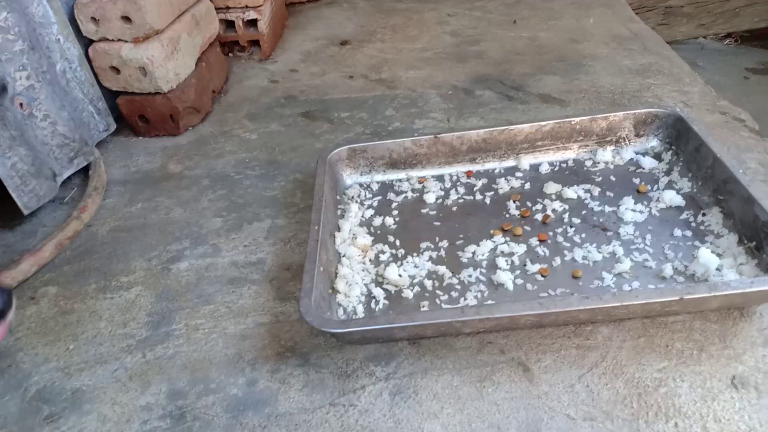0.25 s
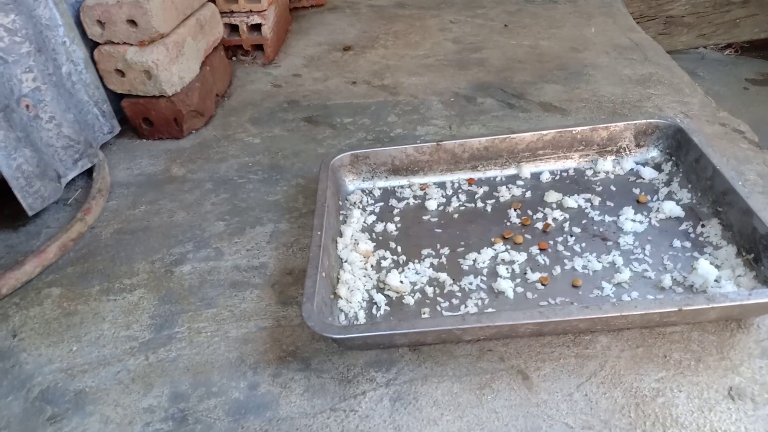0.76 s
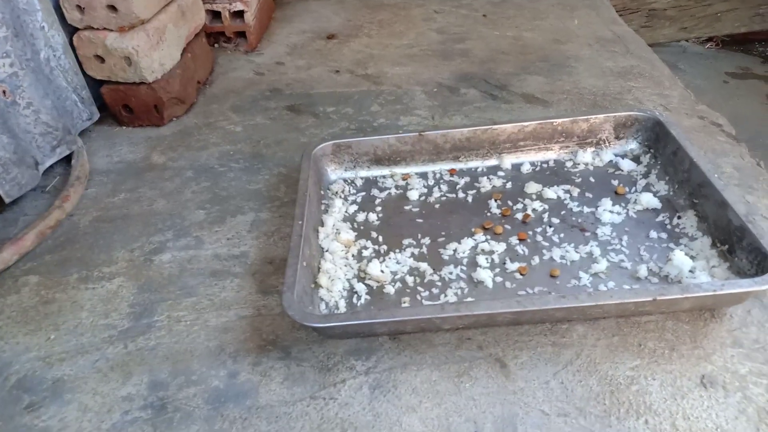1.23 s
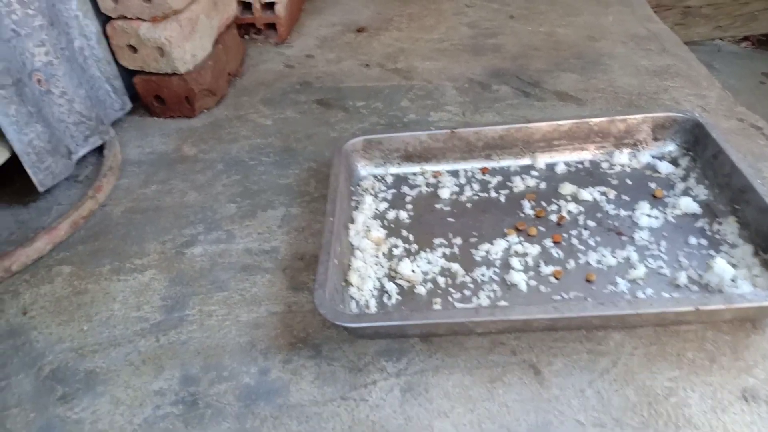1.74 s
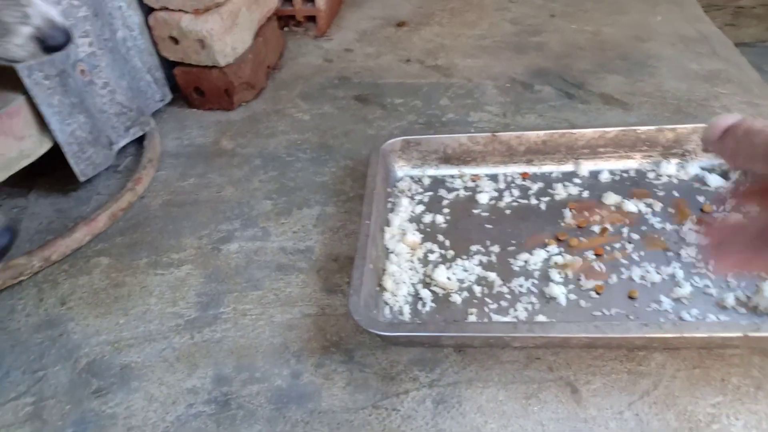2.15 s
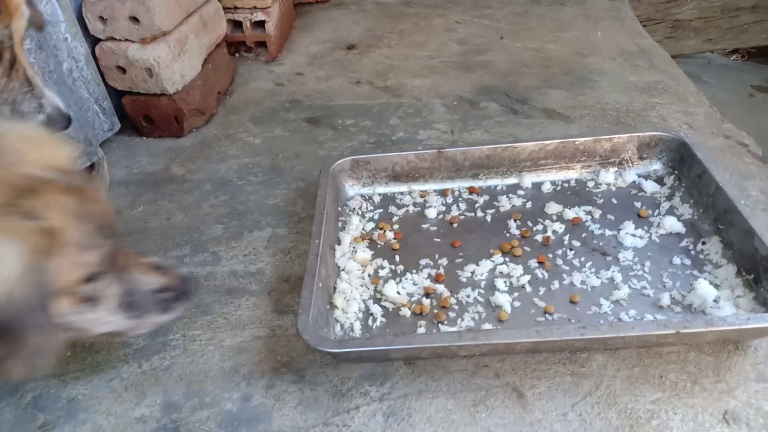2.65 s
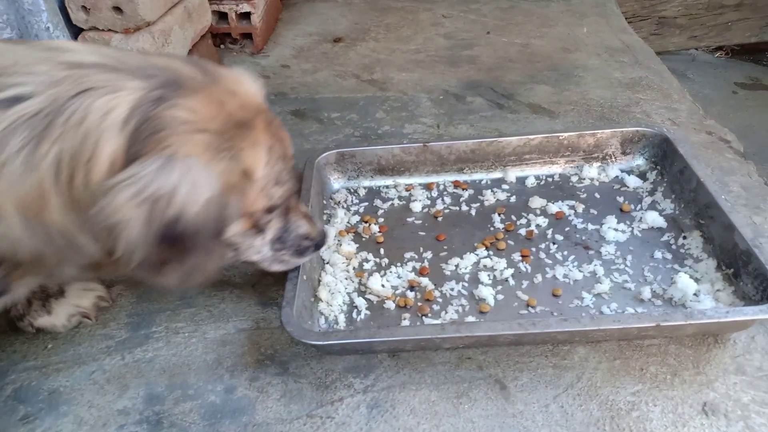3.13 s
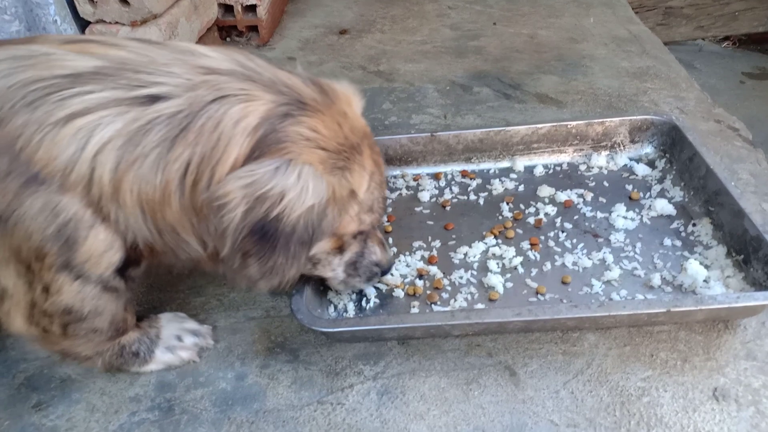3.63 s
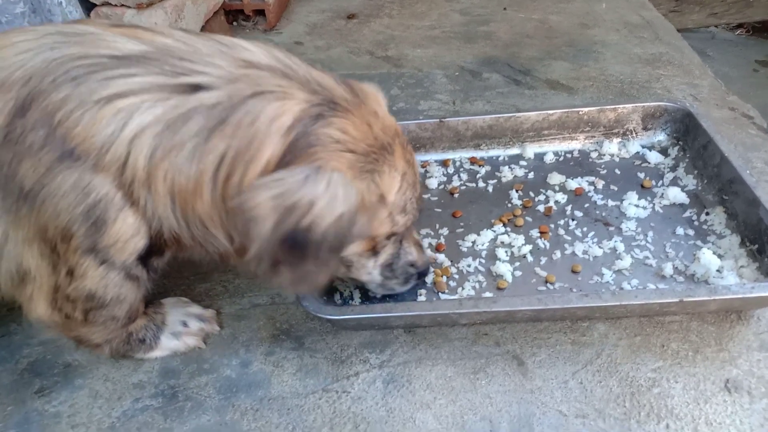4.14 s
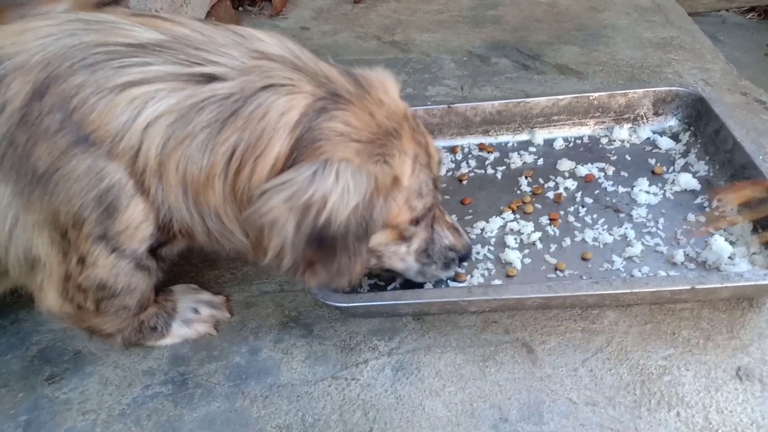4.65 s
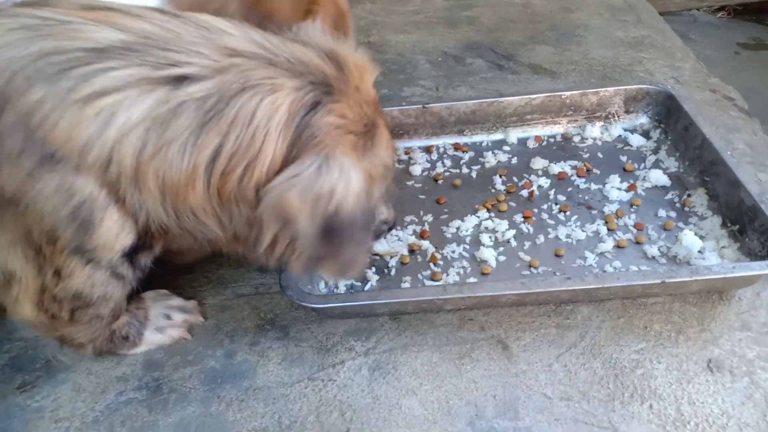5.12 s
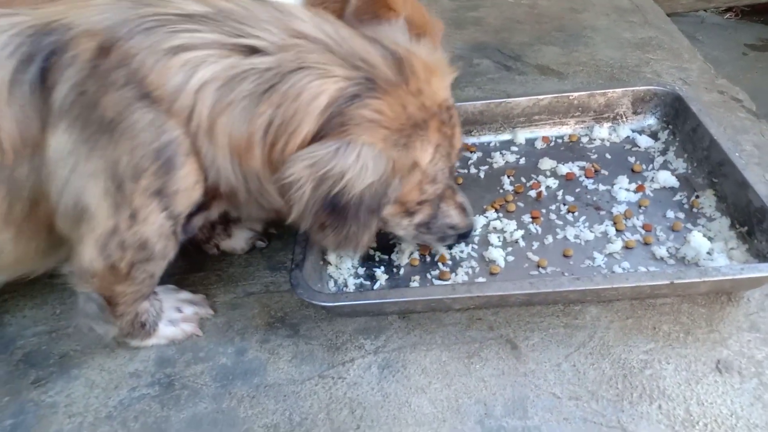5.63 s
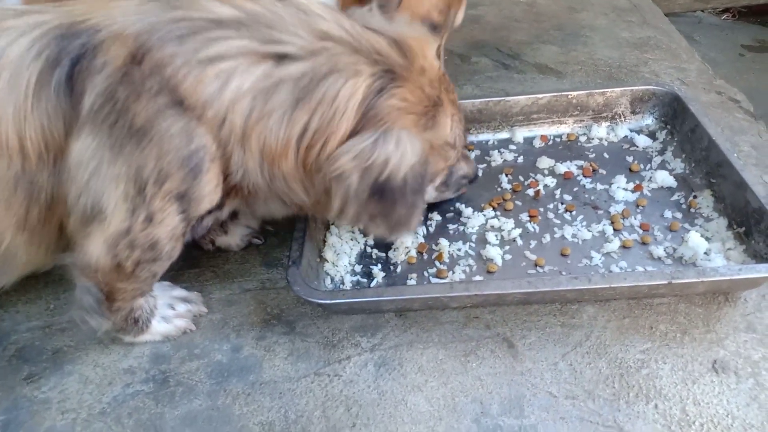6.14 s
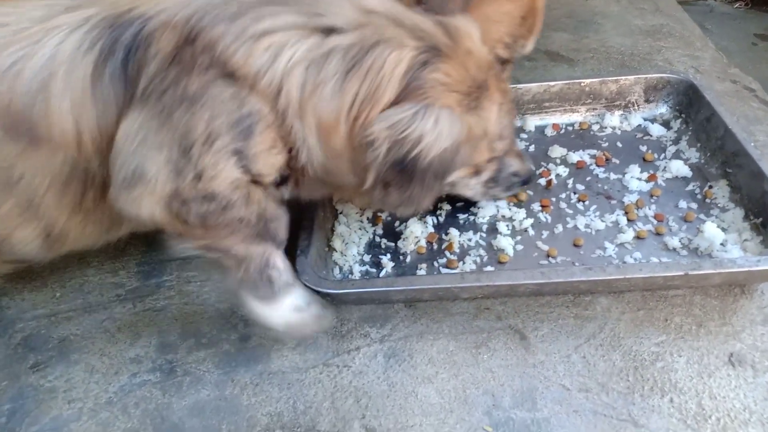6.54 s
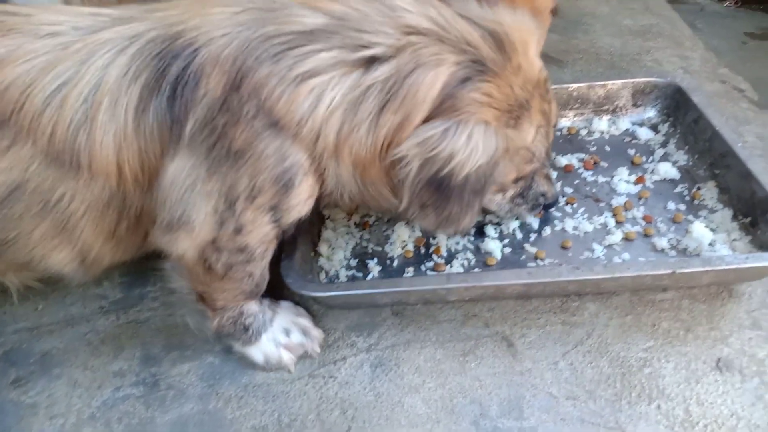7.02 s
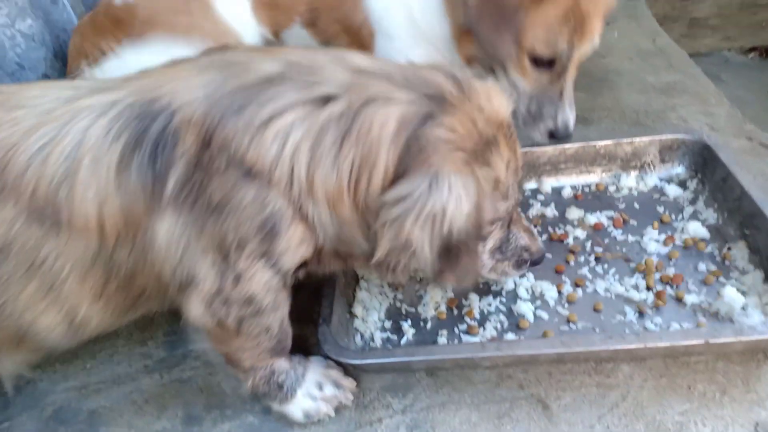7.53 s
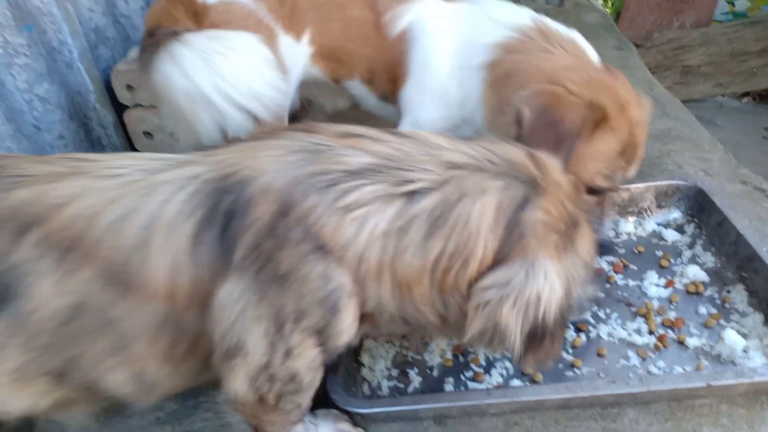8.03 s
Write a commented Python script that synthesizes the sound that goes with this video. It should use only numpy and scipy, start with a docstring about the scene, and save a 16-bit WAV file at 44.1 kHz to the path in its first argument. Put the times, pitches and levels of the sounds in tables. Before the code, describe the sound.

In a small walled yard with soft open-air hiss and a distant idling engine, a brief dropout comes early. A hand rummages in a plastic bag of kibble, then pellets shower and bounce on a steel tray. This happens three times, while a dog nearby starts chewing with wet smacks. Faint bird whistles, rubs and dull bumps join in. Close stereo microphone.

```python
"""First a distant engine hums under soft open-air hiss; early on, all sound is briefly cut to silence.
Rubs, ticks and bird whistles follow in a small walled yard where dogs are fed from a steel tray.
Three times a hand rummages in a bag of kibble and tosses some in: pellets shower down and bounce.
A dog smacks and chews. Hiss, rubs and crackle are filtered noise and clicks; the engine, squeaks
and birds are sine waves; blows ring the modes of the tray, and clacks and smacks are short pops."""
import sys
import numpy as np
from scipy import signal
from scipy.fft import rfft, irfft
from scipy.io import wavfile
from scipy.ndimage import uniform_filter1d

SR = 44100
rng = np.random.default_rng(int(sys.argv[2]) if len(sys.argv) > 2 else 0)


def transcribe(signal):
    """Save signal, clipped to [-1, 1], as a 16-bit WAV file at the path in sys.argv[1]."""
    frames = np.atleast_2d(signal).T
    limited = np.clip(frames, -1, 1)
    pcm = np.round(limited * 32767).astype(np.int16)
    wavfile.write(sys.argv[1], SR, pcm)


N = 365148
TIME = np.arange(N) / SR
GAP_START_S, GAP_END_S = 0.144, 0.255  # the short cut to silence


def amp(db):
    """Decibels to gain."""
    return 10 ** (np.asarray(db) / 20)


def evened(x):
    """Scales to an rms of one."""
    return x / np.sqrt(np.mean(x ** 2) + 1e-20)


def read(points, hz):
    """Reads a table between its points on a log-frequency axis."""
    f, value = np.transpose(points)
    return np.interp(np.log(hz + 1), np.log(f + 1), value)


def level(rows):
    """Gain through time from rows of t/s, level/dB; silent outside them."""
    s, db = np.transpose(rows)
    return np.interp(TIME, s, amp(db), left=0, right=0)


def add(mix, s, sound):
    """Lays a sound into a mix at time s, cut off at the end."""
    part = mix[..., max(round(s * SR), 0):][..., :sound.shape[-1]]
    part += sound[..., :part.shape[-1]]


def convolve(x, response):
    """Filters along time, keeping the scene's length."""
    return signal.fftconvolve(np.atleast_2d(x), np.atleast_2d(response), axes=1)[:, :N]


def click(spectrum, tilt_db=0, size=2048):
    """A click with this spectrum, its energy as early as possible (minimum phase) and equal to one."""
    hz = abs(np.fft.fftfreq(size, 1 / SR))
    octaves = np.log2(np.maximum(hz, 100) / 1000)  # the tilt turns around 1000 Hz
    log_gain = np.log(amp(read(spectrum, hz) + tilt_db * octaves))
    wave = np.fft.ifft(np.exp(np.conj(signal.hilbert(log_gain)))).real[:size // 2]
    return wave / np.linalg.norm(wave)


def grains(per_s, spread_db, size=N):
    """A random train of clicks of uneven size and power one."""
    sizes = amp(spread_db * np.minimum(rng.exponential(1, size), 3))
    sizes = sizes * rng.choice([-1, 1], size)
    return evened(sizes * (rng.random(size) < per_s / SR))


def pop(hz, swell_s, size=900):
    """A heavily damped cavity: a few cycles that swell and die."""
    t = np.arange(size) / SR
    return t / swell_s * np.exp(1 - t / swell_s) * np.sin(2 * np.pi * hz * t)


def waver(per_s):
    """Random wandering of rms one, holding only frequencies below per_s Hz."""
    spectrum = rfft(rng.standard_normal(N))
    return evened(irfft(spectrum * (np.fft.rfftfreq(N, 1 / SR) < per_s), N))


# how alike left and right are in sound from all around: f/Hz, likeness (1 = identical)
LIKENESS = [(50, 1), (250, 0.79), (600, 0.67), (1200, 0), (2500, 0.017), (16000, 0.17)]


def diffuse(size=N):
    """Two channels of noise, alike in the bass and nearly unrelated in the treble."""
    a, b = rfft(rng.standard_normal((2, size)))
    same = np.clip(read(LIKENESS, np.fft.rfftfreq(size, 1 / SR)), -1, 1)
    return irfft([a, same * a + np.sqrt(1 - same ** 2) * b], size)


def burst(decay_s, size=4000):
    """Dying noise like a dense cluster of modes, different at each port, of energy one."""
    wave = diffuse(size) * np.exp(-np.arange(size) / SR / decay_s)
    return wave / np.linalg.norm(wave, axis=1, keepdims=True)


def softened(x, corner_hz):
    """A longer contact rolls off the treble."""
    r = np.exp(-2 * np.pi * corner_hz / SR)
    return signal.lfilter([1 - r], [1, -r], x)


# how long the yard walls ring: f/Hz, time to fall by 60 dB/s
YARD_RING = [(200, 0.31), (1000, 0.23), (3000, 0.22), (6000, 0.2), (15000, 0.14)]


def yard(x, wet_db, lag_samples, pan_db=0, size=16384):
    """Direct sound reaches the right port lag_samples after the left, then the walls ring."""
    hz, t, z = signal.stft(diffuse(size), SR, nperseg=256)
    fading = amp(-60 * t / read(YARD_RING, hz)[:, None])
    tail = signal.istft(z * fading, SR, nperseg=256)[1]
    tail = tail * np.minimum(np.arange(tail.shape[1]) / SR / 0.0024, 1)  # echoes build up in 2.4 ms
    n = np.arange(tail.shape[1]) - 8  # room for the sinc, which delays by parts of a sample
    left = np.sinc(n) * amp(pan_db / 2)
    right = np.sinc(n - lag_samples) * amp(-pan_db / 2)
    return convolve(x, np.array([left, right]) + amp(wet_db) * tail / np.linalg.norm(tail[0]))


# colour of the open-air hiss: f/Hz, level/dB
HISS = [(20, -50), (45, 1.5), (100, -9.5), (250, -2.5), (400, -4.5), (650, -5), (950, -9.5), (1900, -8.5),
        (2600, -9), (3600, -20), (5600, -18), (9000, -34.5), (14000, -29.5), (16000, -39)]
# colour of the far traffic: f/Hz, level/dB
RUMBLE_COLOUR = [(20, -43), (50, -26), (78, -13), (93, 3), (140, 4.5), (200, -10.5), (400, -37),
                 (1000, -62)]
# a far engine idling: t/s, firing rate f/Hz
IDLE_RATE = [(0, 27.5), (2.4, 28), (4.0, 27.5), (4.8, 29.5), (6.6, 29), (7.4, 29), (8.0, 30.6),
             (8.28, 30.5)]
# its overtones: multiple of the firing rate, level/dB
ENGINE_OVERTONES = [(2, -17.5), (3, -17), (4, -1.5), (5, -3), (6, -3), (8, -10)]
# how loud traffic and engine are over time, before their own gains: t/s, level/dB
TRAFFIC_LEVEL = [(0.0, -61.5), (2.19, -56.5), (3.71, -58.5), (3.96, -54.5), (6.2, -52.5), (7.75, -54.5),
                 (8.28, -50)]


def outdoors(hiss_db=-56.5, early_db=-5, swell_db=1.2, rumble_db=-5, engine_db=-4, throb_db=4.0):
    """Filtered noise makes the hiss and rumble; unsteady sine overtones make the idling engine."""
    hz = np.fft.rfftfreq(N, 1 / SR)
    hiss = rfft(diffuse()) * amp(read(HISS, hz))
    hiss = irfft(hiss, N) / np.std(irfft(hiss * (hz > 300), N))  # scaled by its part above 300 Hz
    early = early_db * (TIME < GAP_START_S)  # the hiss is softer before the silent gap
    hiss = amp(hiss_db + early + swell_db * waver(per_s=4.7)) * hiss
    rumble = evened(irfft(rfft(diffuse()) * amp(read(RUMBLE_COLOUR, hz)), N))
    rate = np.interp(TIME, *np.transpose(IDLE_RATE)) * (1 + 0.006 * waver(per_s=2.95))
    turns = np.cumsum(rate) / SR
    engine = np.zeros(N)
    for multiple, db in ENGINE_OVERTONES:
        throb = amp(db + throb_db * waver(per_s=2.8))
        engine += throb * np.sin(2 * np.pi * (multiple * turns + rng.random()))
    traffic = amp(rumble_db) * rumble + amp(engine_db) * evened(engine)
    return hiss + traffic * amp(np.interp(TIME, *np.transpose(TRAFFIC_LEVEL)))


# short rubs and swishes of paws, muzzle, bag and throwing arm:
# t/s, length/s, level/dB, tilt/dB per octave
RUB_TIMES = [(0.083, 0.038, -60.5, 0.5), (0.983, 0.13, -57.5, -5.5), (2.108, 0.16, -57, 5),
             (2.338, .014, -50, -6), (3.315, 0.055, -36.5, 0), (4.416, 0.049, -41.5, 2),
             (4.482, 0.05, -37, 2), (4.644, 0.048, -51.5, 1), (5.642, 0.033, -45, -2.5),
             (7.228, 0.036, -37.5, -0.5), (7.373, 0.089, -38.5, 0), (7.5, 0.015, -39.5, -4.5),
             (7.899, 0.023, -42.5, 2.5), (8.003, 0.024, -44, -3), (8.187, 0.07, -49, 5)]
# colour of a rub: f/Hz, level/dB
RUB_COLOUR = [(150, -11), (300, -14), (600, -2), (1000, 2.5), (1400, -0.5), (2400, 6), (3600, -4.5),
              (5800, -0.5), (8500, -20.5), (15000, -19.5)]
# dull bumps against the tray: t/s, peak level/dB
BUMP_TIMES = [(7.234, -29), (7.405, -44), (7.513, -35), (7.586, -43), (8.083, -41)]
# tones of one bump: f/Hz, level/dB, time to fall by 60 dB/s
BUMP_MODES = [(272, -6, 0.061), (291, -3, 0.1), (372, -7, 0.082), (498, 1.5, 0.065), (539, -4, 0.14)]


def rubs_and_bumps(contact_s=0.0014, size=8000):
    """Rubs and swishes are trains of fine clicks; dull bumps that rock the tray are dying sine waves."""
    sound, t = np.zeros(N), np.arange(size) / SR
    for s, length, db, tilt_db in RUB_TIMES:
        stroke = signal.windows.tukey(int(length * SR), .7)
        grit = grains(per_s=4300, spread_db=-1.5, size=len(stroke))
        add(sound, s, amp(db) * signal.fftconvolve(stroke * grit, click(RUB_COLOUR, tilt_db)))
    bump = sum(amp(db - 60 * t / t60) * np.sin(2 * np.pi * hz * t) for hz, db, t60 in BUMP_MODES)
    bump = bump * np.minimum(t / contact_s, 1)  # a soft muzzle pushes rather than strikes
    for s, db in BUMP_TIMES:
        add(sound, s, amp(db) * bump / abs(bump).max())
    return yard(sound, wet_db=-2.0, lag_samples=1, pan_db=-6.0)


# the hand digging into the kibble: t/s, length/s, level/dB
DIG_TIMES = [(1.211, 0.29, -30.5), (3.175, 0.16, -44.5), (3.367, 0.24, -46.5), (3.578, 0.17, -46.5),
             (3.744, 0.18, -33), (6.124, 0.19, -36.5), (6.285, 0.15, -33)]
# the heap giving way and trickling to rest: t/s, level/dB
SLIDE_TIMES = [(1.47, -41.5), (1.529, -39.5), (3.92, -37), (3.997, -36.5), (4.16, -44), (4.228, -40.5),
               (6.471, -37.5), (6.63, -41.5), (6.69, -50)]


def stirring(dig_skew=1.38, slide_rise_s=0.0041, slide_fade_s=0.061):
    """How fast the kibble moves: digs swell slowly and stop quickly, slides start at once and die away."""
    effort, t = np.zeros(N), np.arange(SR // 2) / SR
    for s, length, db in DIG_TIMES:
        progress = np.linspace(0, 1, int(length * SR))
        add(effort, s, amp(db) * np.sin(np.pi * progress ** dig_skew))
    for s, db in SLIDE_TIMES:
        add(effort, s, amp(db) * np.minimum(t / slide_rise_s, 1) * np.exp(-t / slide_fade_s))
    return effort


# colour of the rustle in the bag: f/Hz, level/dB
RUSTLE_COLOUR = [(240, -66), (400, -40), (626, -29), (839, -31.5), (1290, -5.5), (1420, -12.5), (1600, 0),
                 (2630, -3.5), (3420, -6.5), (5960, -0.5), (7750, -26.5), (9760, -37), (14400, -22.5),
                 (16000, -90)]
# pellets clacking together, before the gains in bag(): t/s, level/dB, ring f/Hz
CLACK_TIMES = [(1.3912, -21.5, 2710), (1.4423, -21.5, 2690), (1.546, -29, 2740), (3.7897, -36, 2680),
               (3.9549, -29, 2620), (3.997, -27.5, 2570), (4.004, -28, 2600), (4.1804, -20.5, 2630),
               (4.223, -25, 2590), (4.2827, -29.5, 2650), (6.4149, -25.5, 2400), (6.4693, -29.5, 2100),
               (6.5268, -29.5, 2570), (6.6294, -24, 2490), (6.672, -30.5, 2550), (6.6958, -22.5, 2520),
               (6.7677, -29.5, 2540)]
# hard ticks of kibble, plastic and claws, before the gains in bag(): t/s, level/dB
TICK_TIMES = [(0.2967, -44.5), (0.5035, -39.5), (0.5146, -40), (0.6908, -43.5), (0.836, -46.5),
              (1.3343, -26.5), (1.443, -23), (1.5227, -31.5), (1.6122, -30.5), (1.7643, -31.5),
              (2.013, -45.5), (3.8804, -27), (4.161, -27.5), (4.2254, -27), (4.4899, -31), (5.317, -44),
              (6.2575, -30.5), (7.879, -39)]
# colour of a tick: f/Hz, level/dB
TICK_COLOUR = [(400, -28), (1500, -4.5), (2600, -3.5), (3600, -1.5), (5800, 5.5), (8500, -17), (11000, -23),
               (14800, -16)]


def bag(stir_db=-5, grind_db=-2, clack_db=2, snap_db=8, tick_db=17, crinkle_db=-2, crackle_db=-12, count=8):
    """Pellets grind and clack as clicks and damped pops; the plastic around them ticks and crackles."""
    effort = stirring() * amp(2 * waver(per_s=89))  # the heap sticks and slips
    rustle = amp(stir_db) * convolve(effort * grains(per_s=1300, spread_db=4.5), click(RUSTLE_COLOUR))
    for hz in np.linspace(2250, 2850, count):  # many small clacks at several pitches
        clack = pop(hz, swell_s=0.00056)
        clack = clack / np.linalg.norm(clack)
        grind = convolve(effort * grains(per_s=40, spread_db=4.5), clack)
        rustle += amp(grind_db) * grind / np.sqrt(count)
    clacks, ticks = np.zeros(N), np.zeros((2, N))
    for s, db, hz in CLACK_TIMES:
        add(clacks, s, amp(db + clack_db) * pop(hz, swell_s=0.00077))
        add(ticks, s, amp(db + snap_db) * burst(decay_s=0.0025))
    for s, db in TICK_TIMES:
        tick = burst(decay_s=0.0011) + amp(crinkle_db) * burst(decay_s=0.0074)
        add(ticks, s, amp(db + tick_db) * tick)
    # the plastic crackles as the heap moves
    ticks += amp(crackle_db) * effort * grains(per_s=110, spread_db=3)
    ticks = convolve(ticks, click(TICK_COLOUR))
    near = yard(rustle + ticks, wet_db=-3, lag_samples=4.55, pan_db=-2.5)
    return near + yard(clacks, wet_db=-2.5, lag_samples=1.3, pan_db=-7)


# thin squeaks and pings: t/s, pitch f/Hz, level/dB, rise/s, fade/s
SQUEAK_TIMES = [(.298, 5800, -51, .004, .04), (4.43, 2300, -31, .022, .008), (4.425, 2680, -41, .025, .018),
                (4.24, 14800, -44, .008, .015)]
# whistles of small birds: loudest moment t/s, pitch f/Hz, glide/Hz per s, level/dB, swell and fade/s
BIRD_NOTES = [(.72, 5100, 4, -56.5, 0.016), (2.97, 5040, -2500, -62, .04), (4.68, 1790, -3000, -50, 0.014),
              (6.13, 1880, -4000, -56, .02), (6.867, 6800, -1200, -35, 0.02),
              (7.15, 7580, 7500, -58, 0.016)]


def whistles(squeak_waver_hz=35, warble_hz=60, size=8000):
    """Near-pure tones whose pitch wanders: small squeaks and pings, and gliding bird notes."""
    sound, t = np.zeros(N), np.arange(size) / SR
    for s, hz, db, rise, fade in SQUEAK_TIMES:
        turns = np.cumsum(hz + squeak_waver_hz * waver(per_s=150)[:size]) / SR
        shape = np.minimum(t / rise, np.exp(-np.maximum(t - rise, 0) / fade))
        add(sound, s, amp(db) * shape * np.sin(2 * np.pi * turns))
    t = np.arange(-size, size) / SR  # zero at the loudest moment
    for s, hz, glide, db, swell in BIRD_NOTES:
        turns = np.cumsum(hz + glide * t + warble_hz * waver(per_s=67)[:len(t)]) / SR
        add(sound, s + t[0], amp(db) * np.exp(-abs(t) / swell) * np.sin(2 * np.pi * turns))
    return yard(sound, wet_db=-4, lag_samples=0, pan_db=-1)


# colour of a pellet striking steel: f/Hz, level/dB
STRIKE_COLOUR = [(150, -21), (300, -33), (400, -22), (520, -12), (700, -4.5), (950, 2), (1400, -0.5),
                 (2450, 5.5), (3600, -3.5), (5600, 4.5), (7500, -7), (9700, -14), (13000, -6), (15700, -13)]
# tones at which the steel sheet rings: f/Hz, level/dB
TRAY_MODES = [(500, 3), (794, 4), (956, 7.5), (1042, -3.5), (1416, 6.5), (1760, 3), (1959, 4), (2341, 6.5),
              (2674, 9), (5380, -16), (5810, 10), (6122, 11.5)]


def tray(blows, ring_db=-9, ring_t60=0.087, clatter_db=-1, clatter_s=0.012, size=8000):
    """The thin sheet answers every blow with a brief clatter and a short, damped ring."""
    t = np.arange(size) / SR
    ring = np.zeros((2, size))
    for hz, db in TRAY_MODES:
        phase = rng.random() + hz / 6000 * rng.random((2, 1))  # left and right differ more in the treble
        ring += amp(db - 60 * t / ring_t60) * np.sin(2 * np.pi * (hz * t + phase))
    struck = blows + amp(clatter_db) * convolve(blows, burst(clatter_s))
    ringing = convolve(blows, amp(ring_db) * evened(ring) / np.sqrt(size))
    return convolve(struck, click(STRIKE_COLOUR)) + ringing


# pellets that bounce high, before pellet_db in kibble(): first strike t/s, second strike t/s,
# share of its flight time that each bounce keeps, level/dB, number of strikes
PELLET_BOUNCES = [(2.35, 2.518, .82, -11.5, 4), (2.361, 2.522, .57, -9.5, 3), (2.404, 2.556, .94, -16, 4),
                  (2.407, 2.571, .744, -12, 3), (4.797, 4.972, .845, -13, 4), (4.805, 4.925, .5, -14, 2),
                  (4.818, 4.939, .68, -13.5, 4), (4.844, 4.986, .68, -12.5, 3), (7.513, 7.632, .756, -8, 4),
                  (7.52, 7.591, .75, -14, 3), (7.526, 7.645, .98, -8.5, 3)]


def bounces(loss_db=5.5):
    """Each bounce of a pellet is shorter and weaker than the one before."""
    blows = np.zeros(N)
    for s, second_s, kept, db, strikes in PELLET_BOUNCES:
        flight = second_s - s
        for k in range(strikes):
            add(blows, s, amp([db - loss_db * k]))
            s, flight = s + flight, flight * kept
    return blows


# handfuls landing on the tray: t/s, length of the shower/s,
# shower level/dB before shower_db, rebound level/dB before its fade
HANDFULS = [(2.349, 0.072, -18, -26.5), (4.797, 0.055, -19, -29.5), (7.513, .027, -17, -31.5)]


def kibble(shower_db=-4, pellet_db=14, fade_db_per_s=62, slow_hz=4000, count=4):
    """Each handful lands in a dense shower, then rebounds more and more weakly and dully on the tray."""
    blows, speed, t = np.zeros(N), np.zeros(N), np.arange(SR * 3 // 4) / SR
    for s, length, db, rebound_db in HANDFULS:
        shower = grains(per_s=1400, spread_db=1.5, size=int(length * SR))
        add(blows, s, amp(db + shower_db) * shower)
        flight = np.clip((t - length - .05) / 0.012, 0, 1)  # pellets fly before they strike again
        rebounds = flight * grains(per_s=170, spread_db=1, size=len(t))
        add(blows, s, amp(rebound_db - fade_db_per_s * t) * rebounds)
        add(speed, s - .005, np.exp(-np.maximum(t - length, 0) / 0.037))
    blows += amp(pellet_db) * bounces()
    spots = np.zeros((count, 2, N))  # blows are shared among a few spots on the tray
    for i in np.flatnonzero(blows):  # no two pellets crack alike; fast ones crack brighter
        crack = softened(burst(decay_s=0.0023, size=400), slow_hz * (1 + 5 * speed[i]))
        add(spots[rng.integers(count)], i / SR, blows[i] * crack)
    return sum(yard(tray(spot), wet_db=-5.0, lag_samples=0) for spot in spots)


# wet chewing between the smacks, before chew_db: t/s, level/dB
CHEW_LEVEL = [(3.4, -61), (3.8, -48.5), (5.4, -60.5), (5.9, -52), (6.8, -47), (7.3, -49.5), (7.45, -44.5),
              (7.85, -56), (8.28, -45.5)]
# colour of the chewing: f/Hz, level/dB
MOUTH_COLOUR = [(150, -16), (300, -9), (550, -3.5), (1000, 0), (1400, -3.5), (2300, 2.5), (3500, -7.5),
                (5800, -4.5), (8500, -23), (15000, -23.5)]
# smacks of tongue and jaw, before the gains in mouth(): t/s, level/dB, front of the mouth f/Hz,
# level of the hollow behind it/dB, its f/Hz
SMACK_TIMES = [(5.8371, -34.5, 2090, -43.5, 1040), (5.8996, -41.5, 2010, -56, 1050),
               (5.977, -31, 2300, -35.5, 1050), (6.9521, -42, 2290, -43, 960),
               (7.0058, -27, 2370, -41, 504), (7.0319, -31.5, 2270, -38, 567),
               (7.0405, -36, 2350, -38.5, 495), (7.0705, -26.5, 2300, -37, 970),
               (7.0933, -34, 2050, -32.5, 950), (7.1221, -42, 2380, -37.5, 920),
               (7.2028, -28, 1830, -35.5, 1000), (7.3726, -37, 1860, -35.5, 919),
               (7.4053, -34.5, 1550, -34, 553), (7.9743, -48, 2650, -45, 631),
               (8.0235, -38.5, 1530, -39.5, 479.9), (8.083, -48, 2280, -35.5, 594),
               (8.113, -40, 2340, -46, 560)]


def mouth(front_db=4, hollow_db=4, chew_db=-2, snap_db=13, bites_per_s=5.4):
    """Tongue and jaw pop two cavities; fine wet crackle swells with every bite."""
    bites = np.cumsum(bites_per_s * (1 + 0.255 * waver(per_s=3.4))) / SR
    crackle = evened(grains(per_s=350, spread_db=4) * (1 + 0.9 * np.sin(2 * np.pi * bites)))
    sound = amp(chew_db) * convolve(level(CHEW_LEVEL) * crackle, click(MOUTH_COLOUR))
    for s, db, hz, low_db, low_hz in SMACK_TIMES:
        front = amp(db + front_db) * pop(hz, swell_s=0.00059)
        hollow = amp(low_db + hollow_db) * pop(low_hz, swell_s=0.0013)
        add(sound, s, front + hollow)
        add(sound, s, amp(db + snap_db) * click(RUB_COLOUR))
    return yard(sound, wet_db=-4, lag_samples=2.48, pan_db=-1.0)


def scene():
    """Everything in the yard."""
    return outdoors() + rubs_and_bumps() + bag() + whistles() + kibble() + mouth()


# how the microphone's two ports differ in colour: f/Hz, left minus right level/dB
PORT_BALANCE = [(60, -2.2), (500, -1.9), (1200, -1.5), (3000, 0), (12000, 2)]


def record(dry, edge_hz=16000):
    """The two-port microphone sheds the lowest bass; a short cut to silence follows, then the treble edge."""
    balance = read(PORT_BALANCE, np.fft.rfftfreq(N, 1 / SR))
    coloured = irfft(rfft(dry) * amp([balance / 2, -balance / 2]), N)
    thinned = signal.sosfilt(signal.butter(2, 45, "highpass", fs=SR, output="sos"), coloured)
    live = 1. * ((TIME < GAP_START_S) | (TIME > GAP_END_S))
    live = uniform_filter1d(live, size=64)  # rounds the edges of the silent gap
    band = signal.firwin(511, edge_hz, window=("kaiser", 9), fs=SR)  # nothing passes above the edge
    return signal.oaconvolve(thinned * live, band[None], "same")


dry = scene()
out = record(dry)
transcribe(out)
```